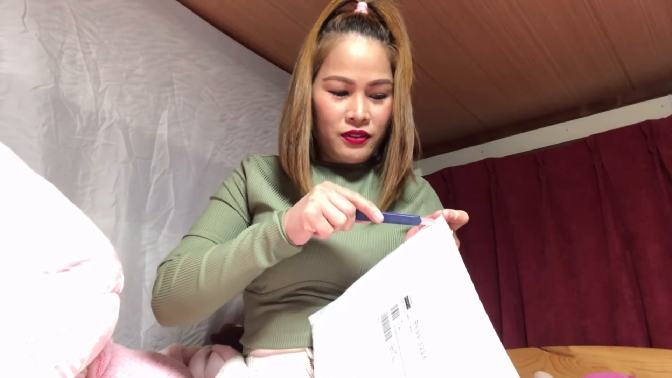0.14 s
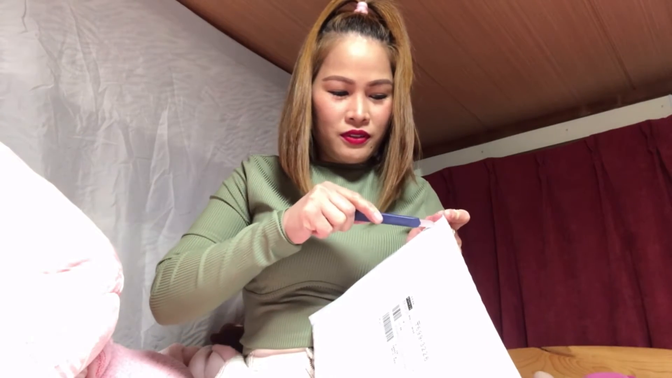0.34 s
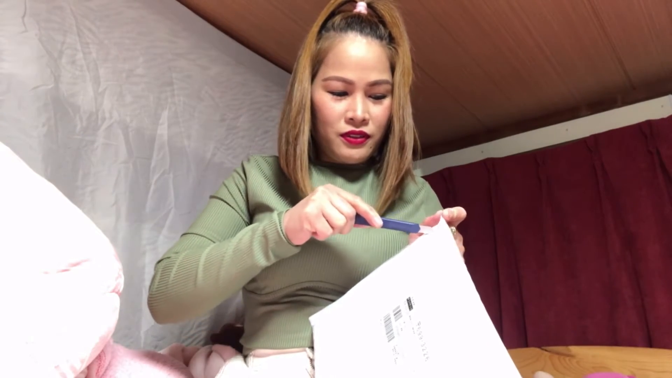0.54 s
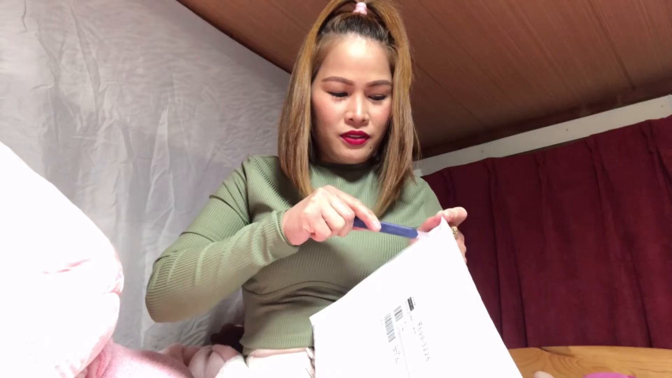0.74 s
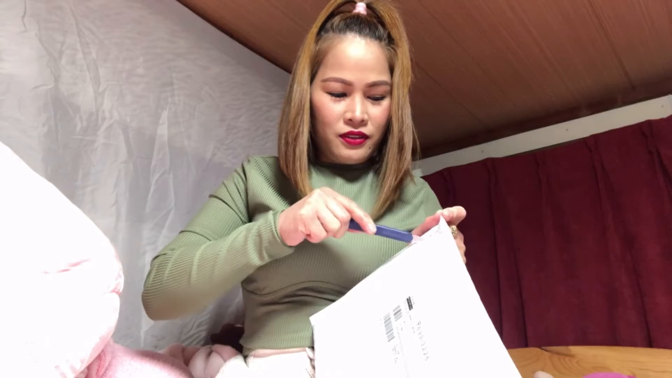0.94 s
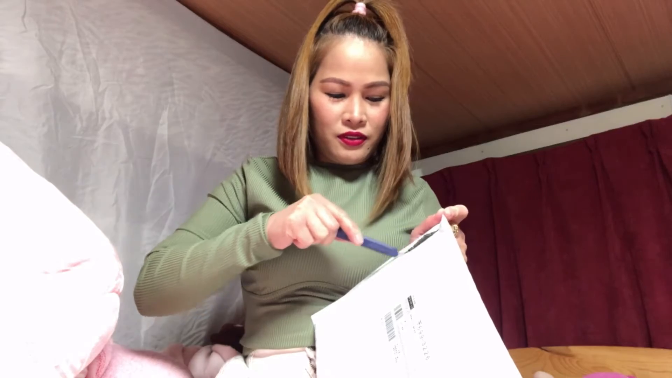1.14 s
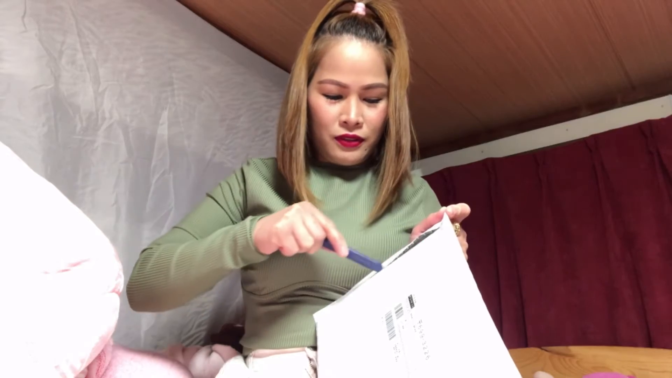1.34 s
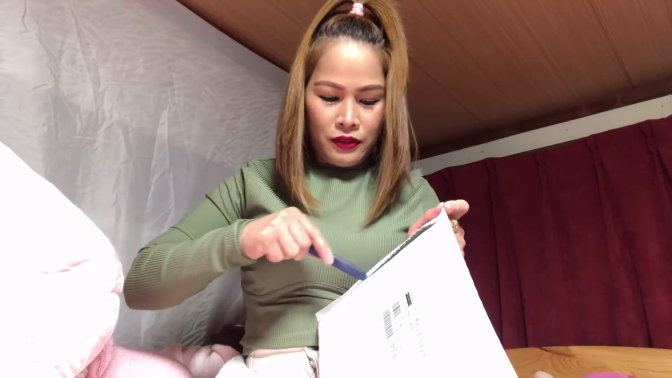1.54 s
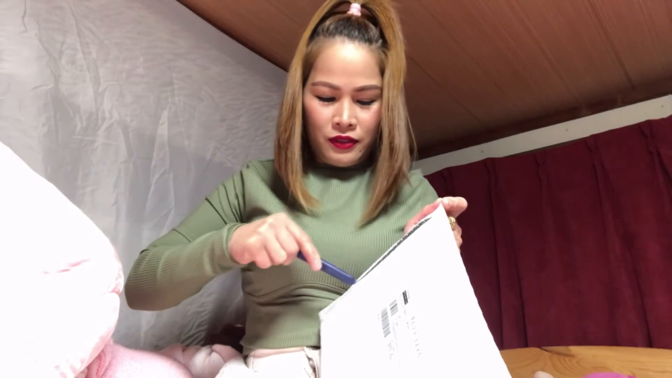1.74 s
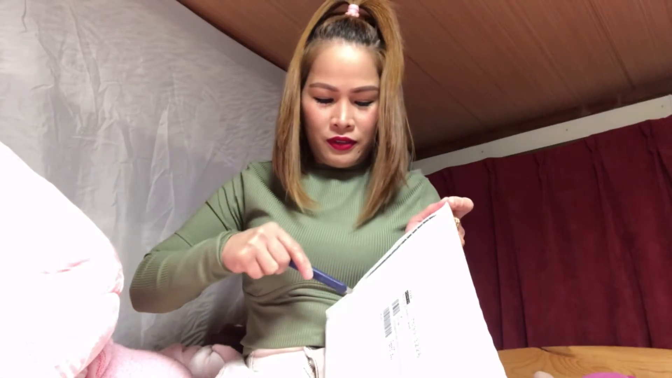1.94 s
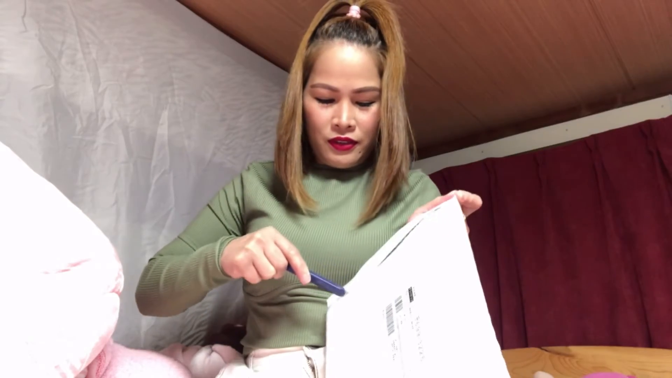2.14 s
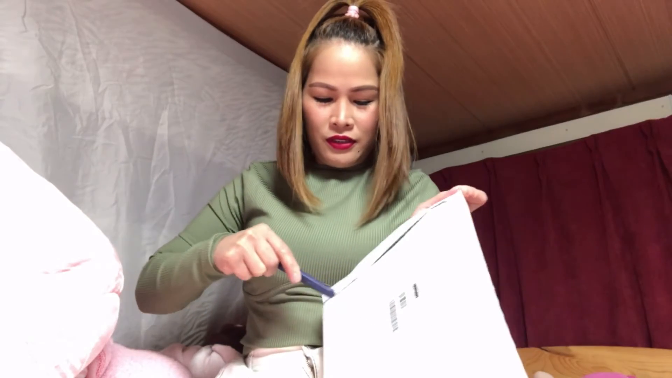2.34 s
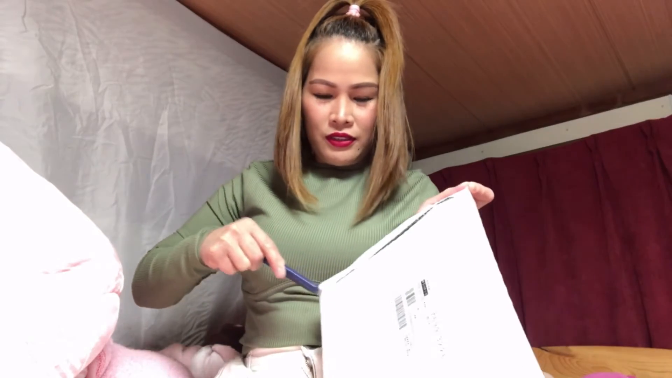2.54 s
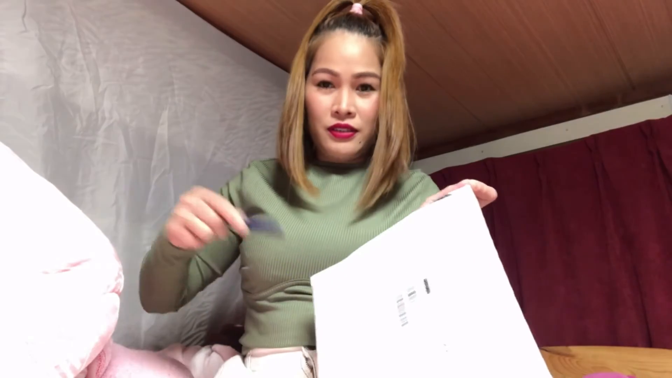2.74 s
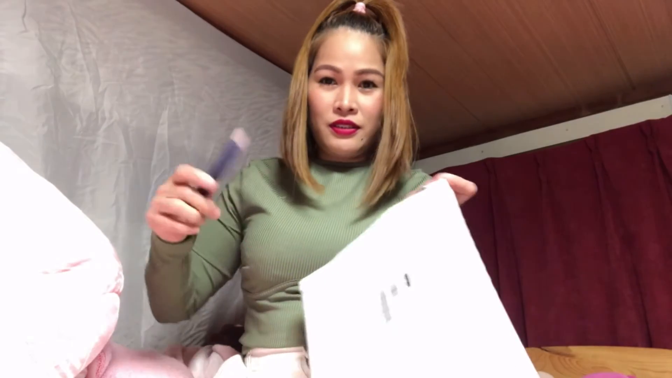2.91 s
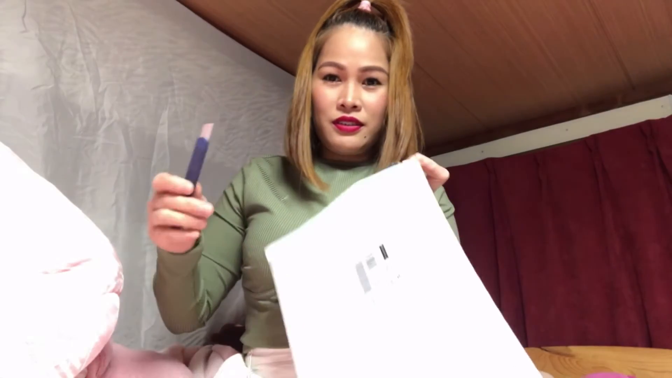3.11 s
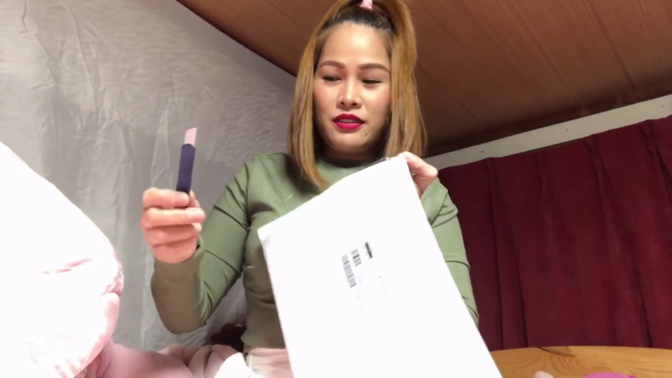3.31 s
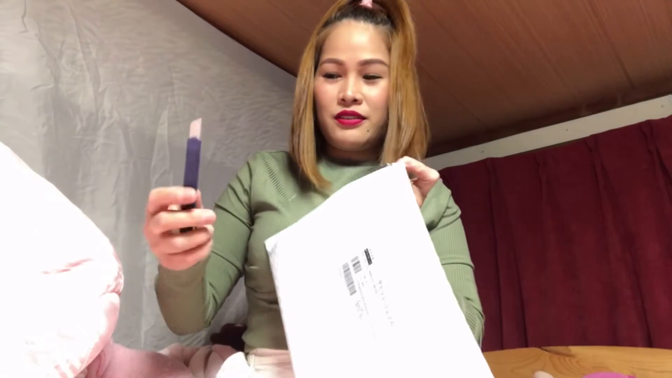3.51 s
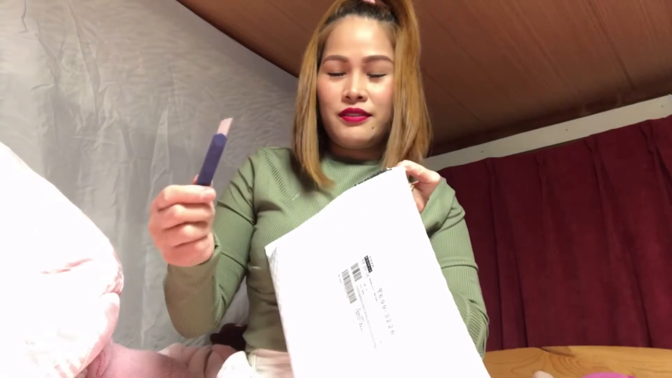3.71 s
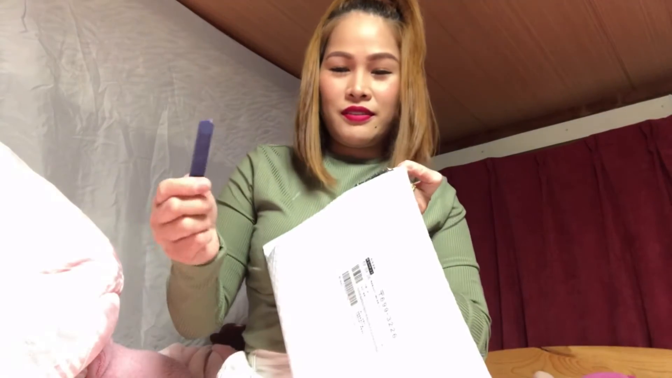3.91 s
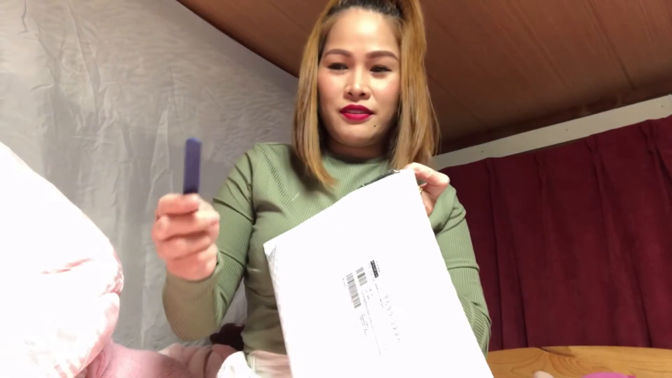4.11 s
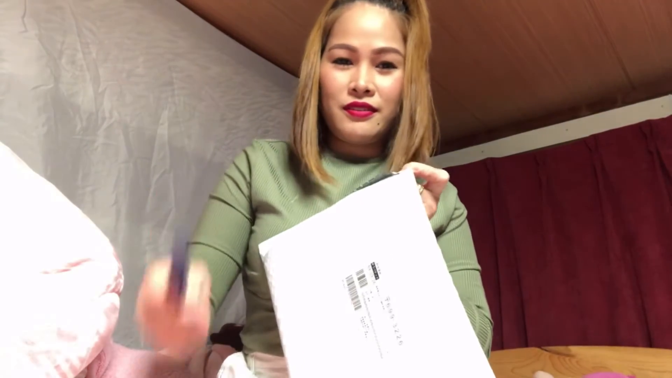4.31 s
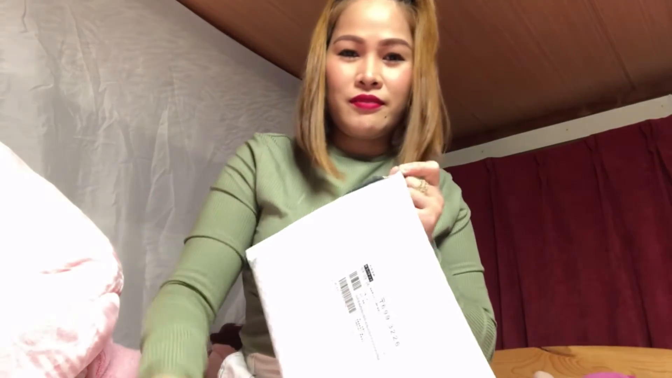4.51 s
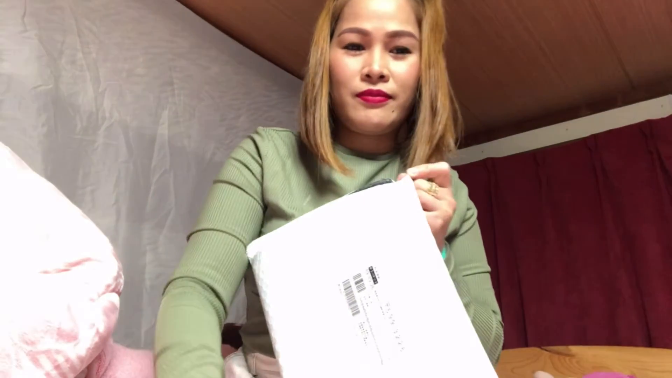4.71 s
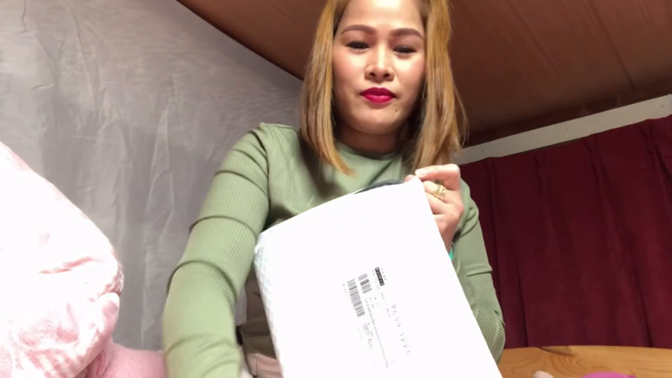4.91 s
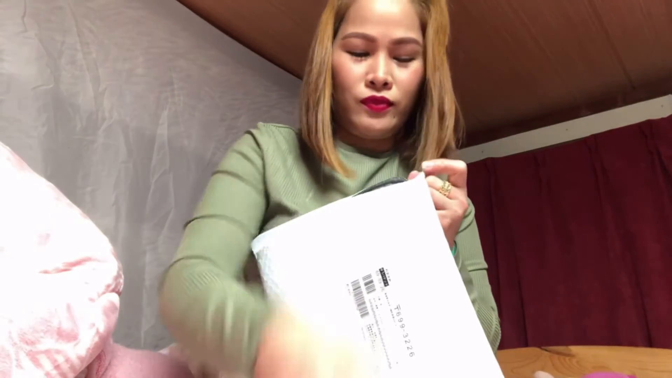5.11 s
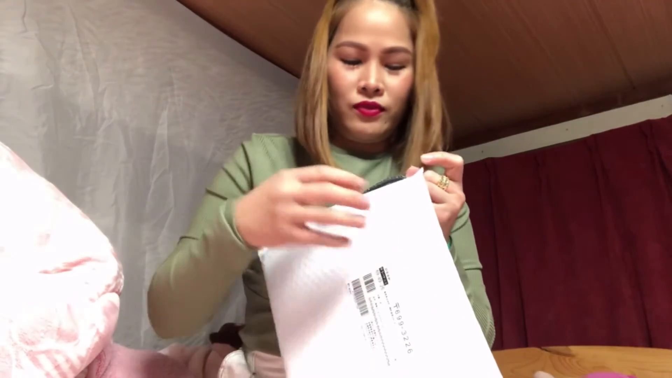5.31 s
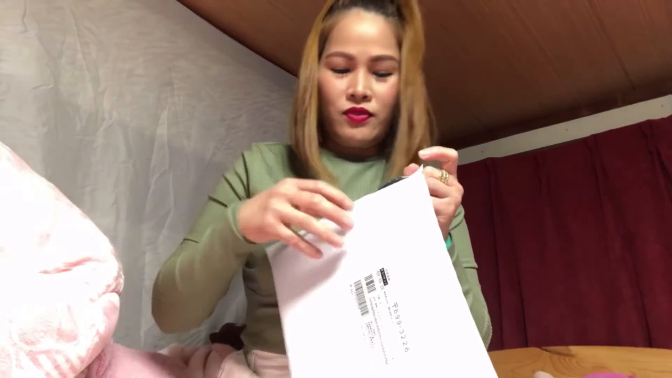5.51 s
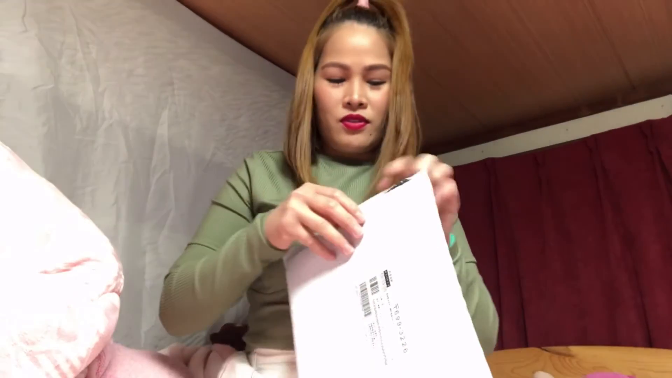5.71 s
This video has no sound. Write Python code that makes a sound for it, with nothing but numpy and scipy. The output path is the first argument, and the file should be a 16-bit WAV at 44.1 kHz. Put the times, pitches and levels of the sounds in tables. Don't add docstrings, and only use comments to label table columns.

```python
import sys
import numpy as np
from scipy import signal
from scipy.fft import irfft
from scipy.io import wavfile
from scipy.ndimage import uniform_filter1d

SR = 44100
rng = np.random.default_rng(int(sys.argv[2]) if len(sys.argv) > 2 else 0)


def linear_from_db(decibels):
    return 10 ** (np.asarray(decibels, float) / 20)


def store_pcm(level_fs):
    pcm = np.round(np.clip(level_fs, -1, 1) * 32767).astype(np.int16)
    wavfile.write(sys.argv[1], SR, np.atleast_2d(pcm).T)


N = 253575
CUT_END_S = 2.47


def envelope():
    # (frequency [Hz], t60 [s])
    sheet_decay = [(300, 0.042), (1000, 0.04), (3000, 0.018), (8000, 0.019), (16000, 0.017)]
    # (frequency [Hz], level [dB])
    shake_colour = [(300, -7), (1000, -8), (1600, -9), (3000, -9), (5000, -6), (10000, -5)]
    rows = bursts()
    noises = rng.standard_normal((len(rows), 600))
    trains = np.zeros((11, N))
    for k, row in enumerate(rows):
        start_s = row[0] - .0005
        add(trains[k % len(trains)], start_s, pop(row, noises[k]))
    shaking = np.zeros(N)
    for train in trains:
        response = dying(sheet_decay, start_s=0.001186, lumpy_db=5.2)
        shaking += signal.oaconvolve(train, response)[:N]
    return trains.sum(0) + coloured(shaking, shake_colour)


def bursts():
    # (time [s], # body peak [dB], snap peak
    # [dB], crack peak [dB])
    cell_pops = [(.0782, -65, -28.5, -31), (.142, -28, -20, -29.5), (.1576, -35, -31.5, -39),
                 (.1753, -52, -38, -42), (.1986, -44, -43, -43), (.279, -55, -47, -47),
                 (.2884, -44, -28.5, -50), (.2972, -35, -23.5, -32.5), (.3098, -37.5, -31.5, -40),
                 (.3132, -37.5, -32, -48), (.381, -53, -48, -51), (.4183, -25, -22.5, -30.5),
                 (.5466, -46, -31, -37), (.5739, -66, -49, -47), (.5904, -40.5, -32, -32),
                 (.6004, -45, -38, -42), (.6088, -68, -36, -45), (.6637, -59, -49, -45.5),
                 (.7394, -42, -35, -31), (.7467, -49, -26.5, -39), (.7614, -28, -20, -25.5),
                 (.787, -57, -46, -39), (.7959, -60, -24.5, -38), (.8142, -31, -23, -32),
                 (.8249, -50, -38, -37), (.8401, -26, -20.5, -23),
                 (0.9665, -36.5, -28.5, -37), (0.975, -46, -35, -44), (0.9823, -22, -20.5, -16),
                  (0.989, -32, -44, -42), (0.9956, -25, -29, -29), (1.0184, -28, -25, -27),
                  (1.0574, -25.5, -21, -19.5), (1.0771, -32, -23.5, -23), (1.0805, -25, -41, -46),
                  (1.131, -52, -42, -41), (1.136, -24.5, -25.5, -20), (1.152, -30, -31, -28),
                  (1.1647, -35, -31, -34), (1.1911, -28, -26.5, -28), (1.205, -29, -32, -33),
                  (1.2231, -20, -23, -24), (1.245, -26.5, -29, -25.5), (1.2698, -27, -46, -37),
                  (1.284, -28, -38, -40), (1.3132, -20.5, -28, -27), (1.3265, -16.5, -20, -20),
                  (1.37, -28, -31, -37), (1.3748, -22.5, -29, -34), (1.3799, -24.5, -26.5, -26.5),
                  (1.425, -25, -27, -35), (1.4397, -21, -28, -28.5),
                 (1.494, -24, -27, -34), (1.512, -34, -47, -50), (1.5125, -28.5, -33, -31.5),
                   (1.5156, -26.5, -35, -48), (1.5752, -24, -27.5, -27), (1.581, -47, -32, -44),
                   (1.5987, -28.5, -30, -37), (1.606, -26, -27.5, -33), (1.66, -23, -26, -29),
                   (1.6888, -30, -24, -31), (1.715, -22, -21.5, -23), (1.733, -49, -42, -54),
                   (1.7485, -31.5, -34, -35), (1.786, -32, -33, -33), (1.7925, -27, -29, -28),
                   (1.7964, -32, -28, -32), (1.8328, -19, -17, -20.5), (1.8533, -26.5, -21, -25),
                   (1.888, -32, -28.5, -24.5), (1.912, -24.5, -21.5, -27), (1.9401, -31.5, -30, -31),
                   (1.9586, -36, -29, -35),
                 (2.0045, -32, -27.5, -35), (2.021, -16, -17, -16.5), (2.0393, -45, -19, -48),
                 (2.0425, -22.5, -47, -28), (2.0736, -28, -19, -32), (2.0848, -28, -31, -36),
                 (2.1022, -17, -13, -14), (2.1391, -22, -13.5, -22), (2.1663, -27, -24, -37),
                 (2.2338, -27, -14, -16), (2.2436, -33, -39, -43), (2.2605, -23, -18, -23.5),
                 (2.274, -27, -20.5, -24), (2.2794, -28.5, -24, -34), (2.3166, -33, -17.5, -32),
                 (2.3232, -29.5, -27, -29), (2.327, -30.5, -22, -30), (2.3629, -30, -19, -33),
                 (2.3739, -29.5, -17, -26.5), (2.416, -44, -36, -44), (2.424, -38.5, -30.5, -41),
                 (2.455, -42, -34.5, -46), (2.637, -25, -27, -31), (2.6445, -28, -31, -41),
                 (2.6515, -47, -34, -53),
                 (0.455, -60, -45, -51), (.5975, -49, -39, -52), (.7886, -55, -43, -50),
              (0.7598, -33, -20.5, -29), (0.833, -54, -50, -53), (1.054, -38, -40, -42),
              (1.177, -39, -34, -37), (1.2011, -52, -41, -52), (1.2534, -50, -34, -54),
              (1.262, -41, -38, -36), (1.288, -54, -37, -37), (1.321, -35, -35, -31), (1.39, -31, -46, -55),
              (1.403, -44, -39, -55), (1.4454, -31, -35, -44), (1.4576, -50, -36, -50),
              (1.521, -37, -40, -40), (1.646, -53, -46, -48), (1.7736, -45, -35, -51),
              (1.899, -40, -46, -54), (1.9078, -38, -34, -54), (1.9554, -39, -43, -55),
              (1.9906, -42, -37, -49), (2.0245, -46, -25, -32), (2.1392, -26.5, -20, -24.5),
              (2.1627, -35, -32, -39), (2.1906, -43, -48, -51), (2.347, -46, -35, -48),
              (2.4284, -43, -48, -53), (2.441, -59, -42, -56), (2.446, -61, -41, -49),
              (2.4492, -52, -38, -41), (2.649, -48, -33, -48)]
    # (time [s], body [Hz], snap [Hz])
    flap = [(0.1, 1670, 3150), (.55, 1200, 3050), (0.762, 990, 2600), (1.05, 1700, 3300),
            (1.25, 1640, 2620), (1.45, 1550, 3140), (1.6, 1180, 2460), (2.08, 1370, 2880),
            (2.4, 1040, 2570), (2.63, 1300, 3560)]
    # (time [s], snap [Hz], snap peak [dB], crack peak [dB])
    handling_ticks = [(2.839, 2800, -33.5, -52), (2.89, 2700, -36.5, -49), (3.158, 2690, -32, -52),
                      (3.1875, 3320, -51, -35), (3.3975, 2730, -43, -49), (3.6562, 4570, -34, -32),
                      (3.674, 4160, -48, -36), (3.707, 3170, -29.5, -47), (3.7344, 2600, -36.5, -35),
                      (3.788, 2670, -40, -40), (2.871, 5840, -42, -40), (3.687, 3000, -48, -57),
                      (3.993, 3620, -30, -46), (4.4055, 6160, -47.5, -59), (4.494, 2600, -43, -62),
                      (4.726, 6000, -53, -43), (5.0853, 3000, -49, -45), (5.093, 5200, -40, -56),
                      (5.1185, 5000, -46, -41), (5.1525, 4830, -43, -49), (4.312, 4500, -37, -43),
                      (4.356, 4800, -51, -44), (4.4453, 3920, -26, -29.5), (4.508, 2380, -47, -58),
                      (4.641, 5000, -43, -47), (4.6826, 2480, -42, -44), (4.71, 2600, -27.5, -42),
                      (4.748, 2700, -35.5, -44), (5.1067, 5470, -28, -29), (5.1325, 2080, -47, -60),
                      (5.1562, 4450, -32, -34.5), (5.1716, 3300, -36.5, -45), (5.296, 2200, -52, -54),
                      (5.484, 2980, -41, -54), (5.637, 2590, -40.5, -49), (5.733, 2700, -49, -51)]
    # (time [s], body [Hz], body peak [dB])
    thuds = [(0.316, 357, -48), (.422, 420, -40), (1.06, 565, -32), (2.025, 241, -39.5), (5.163, 294, -45),
             (.764, 396, -40), (1.137, 570, -28.5), (1.286, 614, -29.5), (1.915, 470, -34),
             (2.9513, 1230, -41), (3.159, 1490, -36.5), (3.706, 1650, -42.5), (3.7354, 1100, -41),
             (4.4461, 1950, -31.5), (4.708, 1400, -30), (4.709, 740, -28.5), (4.71, 452, -32.5),
             (4.7475, 720, -53), (5.099, 1190, -34), (5.1066, 1290, -38), (5.1325, 1190, -36),
             (5.1522, 1130, -40.5), (5.1565, 584, -36.5), (5.171, 1620, -35), (3.2085, 1210, -49),
             (3.235, 1300, -48), (4.508, 1300, -44.5), (4.816, 1200, -47), (5.1125, 515, -38),
             (5.1362, 756, -36), (5.631, 1320, -49.5), (5.484, 1880, -42), (5.733, 670, -48)]
    silent_db = -90
    flap_s, flap_body_hz, flap_snap_hz = np.transpose(flap)
    cells = cell_pops
    scatter = np.exp(.07 * rng.standard_normal((len(cells), 2)))
    rows = []
    for (s, body_db, snap_db, crack_db), (body_shift, snap_shift) in zip(cells, scatter):
        body_hz = np.interp(s, flap_s, flap_body_hz) * body_shift
        snap_hz = np.interp(s, flap_s, flap_snap_hz) * snap_shift
        rows.append((s, body_hz, body_db, snap_hz, snap_db, crack_db))
    for s, hz, snap_db, crack_db in handling_ticks:
        rows.append((s, hz / 2, silent_db, hz, snap_db, crack_db))
    for s, hz, body_db in thuds:
        rows.append((s, hz, body_db, 2 * hz, silent_db, silent_db))
    return rows


def pop(row, noise):
    # (frequency [Hz], level [dB])
    crack_colour = [(3500, -23.5), (5000, 5), (7000, 1), (8600, -4.5), (10500, -4.5), (15500, -5)]
    pull_start_s, slider_end_s = 1, 4.3
    s, body_hz, body_db, snap_hz, snap_db, crack_db = row
    t = np.arange(len(noise)) / SR

    gentle = 0 < s < pull_start_s or s > slider_end_s
    dull_db = -11.5 * gentle
    colour = [(hz, db + dull_db * max(np.log2(hz / 8000), 0)) for hz, db in crack_colour]
    crack_shape = swell(t, .0001, 0.00015) + 0.12 * swell(t, 0, 0.0012)
    crack = coloured(noise * crack_shape, colour)

    snap_turns = snap_hz * (t - .00012 * np.exp(-t / .0008))
    snap = np.sin(2 * np.pi * snap_turns + noise[0]) * swell(t, .0001, .56 / snap_hz)
    body_turns = body_hz * (t - 0.43 * 0.00089 * np.exp(-t / 0.00076))
    swing = np.sin(2 * np.pi * body_turns + noise[1]) * swell(t, 0.00035, 0.4 / body_hz)
    body = band(swing, 180, 1470)
    return linear_from_db(crack_db) * peaked(crack) + linear_from_db(snap_db) * peaked(snap) + linear_from_db(body_db) * peaked(body)


def cell_rings():
    # (time [s], peak [dB], pitch [Hz])
    paper_rings = [(0.0767, -41, 3530), (0.1406, -23, 3400), (0.2872, -37, 3550), (0.2957, -54, 1800),
                   (0.2957, -23, 3520), (0.417, -18.5, 3670), (0.5453, -31, 3630), (0.573, -43, 3510),
                   (0.5891, -23, 4010), (0.745, -18.5, 3770), (0.7597, -21, 3140), (0.7946, -30, 3540),
                   (0.8127, -18.5, 1860), (0.8392, -22, 2540), (0.9652, -32, 3490), (0.9812, -15, 2300),
                   (1.0171, -19, 1780), (1.056, -17.5, 1760), (1.076, -25, 3500), (1.1343, -21, 1790),
                   (1.19, -22, 3650), (1.2228, -22, 1960), (1.2441, -22, 1780), (1.3107, -24, 1800),
                   (1.3248, -12, 1880), (1.3803, -33, 1840), (1.4232, -19, 1820), (1.4923, -25, 1820),
                   (1.5738, -22, 1830), (1.6044, -30, 2460), (1.6584, -31, 1830), (1.687, -29, 2530),
                   (1.714, -21, 3080), (1.832, -16, 3020), (1.852, -19, 3430), (1.886, -23, 2710),
                   (1.9111, -22, 2770), (1.9385, -27, 3330), (2.0043, -21, 2740), (2.019, -10, 2420),
                   (2.0722, -20, 3380), (2.1006, -11, 3280), (2.1385, -10, 3240), (2.1645, -22, 3000),
                   (2.2328, -15, 2730), (2.2589, -11, 2750), (2.3159, -17, 3230), (2.361, -17, 2680)]
    t60_s, rise_s, lag_s = 0.011, 0.00024, .0009
    t, out = np.arange(900) / SR, np.zeros(N)
    shape = linear_from_db(-9 - 60 * t / t60_s) * (1 - np.exp(-t / rise_s))
    for s, db, hz in paper_rings:
        lower = np.sin(2 * np.pi * hz * t)
        upper = 0.35 * np.sin(2 * np.pi * 1.7 * hz * t)
        add(out, s + lag_s, linear_from_db(db) * shape * (lower + upper))
    return out


def creaks():
    # (end [s], length [s], level [dB])
    strains = [(.142, 0.0042, -34), (0.7496, 0.0071, -36), (0.792, .005, -46), (0.815, .005, -35),
               (0.843, .004, -33), (1.515, 0.0043, -35), (1.576, 0.003, -27), (1.598, .005, -39),
               (1.716, 0.005, -37), (1.746, .004, -40), (4, 0.0058, -37), (1.057, .005, -36),
               (1.205, 0.0048, -36), (1.287, 0.0082, -34)]
    out = np.zeros(N)
    draws = rng.standard_normal((len(strains), 2, 500))
    for (end_s, length_s, db), (a, b) in zip(strains, draws):
        u = np.arange(len(a)) / SR / length_s
        grains = a * b * swell(u, 0, 0.31) * (u < 1.3)
        add(out, end_s - length_s, linear_from_db(db) * peaked(band(grains, 1500, 3900)))
    return out


def pocket():
    # (time [s], pitch [Hz], level [dB])
    lip_knocks = [
        (2.616, 1480, -42),
        (2.627, 1670, -45),
        (2.6366, 1440, -28.5),
        (2.6438, 1550, -30),
        (2.6472, 1420, -33),
        (2.6529, 1460, -25.5),
    ]
    slip_s, rise_s, fall_s = 2.634, 0.016, 0.004
    air_hz, air_width = 1550, 0.092
    knock_t60_s = .014
    t = np.arange(N) / SR - slip_s
    drag = rng.standard_normal(N) * np.exp(np.where(t < 0, t / rise_s, -t / fall_s))
    air = band(drag, air_hz * (1 - air_width), air_hz * (1 + air_width))
    out = linear_from_db(-45.5 + 9.5) * peaked(air)
    t = np.arange(1200) / SR
    for s, hz, db in lip_knocks:
        add(out, s, linear_from_db(db - 60 * t / knock_t60_s) * np.sin(2 * np.pi * hz * t))
    return out


def ratchet():
    # (time [s], peak [dB], lead of the first touch [s])
    slider_teeth = [
        (3.8019, -8.5, 0.0017),
        (3.82, -9.5, 0.0012),
        (3.8401, -9, 0.00092),
        (3.8682, -9, 0.0021),
        (3.896, -8.5, 0.0012),
        (3.914, -10, 0.0013),
        (3.9362, -10, 0.0019),
        (3.958, -11, 0.001),
        (3.975, -12.5, 0.00048),
        (3.996, -35, 0.0012),
    ]
    # (frequency [Hz], density [dB per Hz])
    handle_colour = [(350, -33), (600, -46.5), (869, -18), (1750, -18), (2760, 0), (3120, -19),
                     (3830, -2.5), (5120, -8), (5400, -1), (8270, -4), (8990, -6), (11300, -2.5),
                     (16000, -13)]
    # (frequency [Hz], level [dB], t60 [s])
    blade_modes = [(2800, -9, .02), (3960, -12, .015), (4830, -10, .025), (5440, -9, .025),
                   (5850, -10, .025), (6300, -11, .022), (7300, -11, .02), (8280, -11, .02),
                   (10250, -12, .018), (11020, -11, .02), (11950, -15, .12), (14360, -10, .08)]
    t, hits, rung = np.arange(4000) / SR, np.zeros(N), np.zeros(N)
    for s, db, lead_s in slider_teeth:
        # (delay [s], level [dB], rise [s])
        steps = [(0, -6, .001), (lead_s, 0, .0005), (lead_s + 0.0018, -11, .001), (lead_s + 0.0036, -21, .004)]
        shape = sum(linear_from_db(step_db) * swell(t, at_s, rise_s) for at_s, step_db, rise_s in steps)
        hit = linear_from_db(db) * peaked(rng.standard_normal(len(t)) * shape)
        ring = np.zeros(len(t))
        for hz, mode_db, t60_s in blade_modes:
            level_scatter, pitch_scatter = rng.standard_normal(2)
            fall = linear_from_db(mode_db + 4 * level_scatter - 60 * t / t60_s)
            ring += fall * np.sin(2 * np.pi * hz * (1 + .002 * pitch_scatter) * t)
        add(hits, s, hit)
        add(rung, s, signal.oaconvolve(hit, ring))
    rattle = evened(coloured(hits, handle_colour))
    return 1.03 * np.std(hits) * (rattle + linear_from_db(-12) * evened(rung))


def latch():
    # (frequency [Hz], level [dB], t60 [s])
    lock_modes = [(3316, 0, .017), (3800, -5, .014), (4300, -9, .012), (5110, -9, .02), (6020, -11, .02),
                  (6940, -8, .02), (7560, -15, .02), (9130, -8, .03), (10870, -11, .025), (11830, -8, .025),
                  (13420, -17, .025), (2400, -6, .006), (1600, -14, .008)]
    # (time [s], ring peak [dB], rattle peak [dB])
    contacts = [
        (4.2056, -65, -40),
        (4.2068, -48, -23),
        (4.2079, -22.5, -29),
        (4.2096, -33, -25),
    ]
    t, out = np.arange(1500) / SR, np.zeros(N)
    draws = rng.standard_normal((len(contacts), len(t)))
    for (s, ring_db, rattle_db), noise in zip(contacts, draws):
        ring = np.zeros(len(t))
        for k, (hz, db, t60_s) in enumerate(lock_modes):
            ring += linear_from_db(db - 60 * t / t60_s) * np.sin(2 * np.pi * hz * t + 3 * noise[k])
        ring *= np.minimum(t / 0.00096, 1)
        rattle = band(noise * swell(t, 0, 0.00056), 4700, 13600)
        add(out, s, linear_from_db(ring_db) * peaked(ring) + linear_from_db(rattle_db) * peaked(rattle))
    return out


def rubbing():
    # (time [s], level [dB])
    rub_level = [(0, -86), (.4, -91), (.72, -86.5), (.95, -79), (1.05, -63.5), (1.6, -68.5), (2.102, -66.5),
                 (2.5, -60.5), (3.0, -56.5), (3.33, -65.5), (3.5, -66.5), (4.1, -65), (4.45, -58),
                 (4.9, -66), (5.03, -63), (5.22, -64), (5.37, -68.5), (5.5, -58)]
    # (frequency [Hz], density [dB per Hz])
    rub_colour = [(180, -48.5), (300, -6.5), (537, 0), (614, 0.5), (701, 0), (801, -2.5), (3460, -1.5),
                  (4020, -9), (5160, -4.5), (6850, -7.5), (11500, -12), (16000, -17)]

    def colour(hz, t):
        swipe_db, swipe_body_db = pressure(t)
        patches = rng.standard_normal((len(t), len(hz)))
        patches = uniform_filter1d(uniform_filter1d(patches, 12, 0), 4, 1).T
        flicker = uniform_filter1d(rng.standard_normal(len(t)), 4)
        tilt_db = -3 - 0.14 * swipe_db
        bright = tilt_db * np.clip(np.log2((hz + 1) / 4000), 0, 1.5)
        body_db = np.where(t < CUT_END_S, 10.5, 0) + swipe_body_db
        body = body_db * np.clip(np.log2(1500 / (hz + 1)), 0, 1)
        return read(rub_colour, hz) + bright + body + 2.0 * evened(patches) + 1.7 * evened(flicker)

    t = np.arange(N) / SR
    s, level_db = np.transpose(rub_level)
    loudness = linear_from_db(np.interp(t, s, level_db) + pressure(t)[0] + 1.5)
    return loudness * (evened(field(colour, size=256)) + crackle(t))


def pressure(t):
    # (centre [s], length [s], rise [dB], extra low body [dB])
    swipes = [(0.478, 0.15, 28.5, -17), (0.841, 0.061, 37, -2), (0.991, 0.065, 29, 2),
              (1.222, 0.24, 7, 5.5), (1.757, 0.41, 7, -7), (2.085, 0.31, 7.5, 7.5), (2.337, 0.25, 8.5, 1),
              (2.624, 0.28, 7.5, 0.5), (3.04, 0.14, 5, 0.5), (3.267, 0.29, 10.5, 7),
              (3.404, 0.077, 12.5, 2.5), (3.667, 0.18, 7.5, -7.5), (3.999, 0.088, 15, -2),
              (4.847, 0.52, 10.5, 2), (5.123, 0.2, 11.5, 5.5), (5.76, 0.07, 16, 4)]
    total = 0
    for s, length_s, *rises_db in swipes:
        hump = np.cos(np.pi * np.clip((t - s) / length_s, -.5, .5)) ** 2
        total = total + np.outer(rises_db, hump)
    return total


def crackle(t):
    rate_hz, kinds = 520, 8
    draws, out = rng.random((N, 2)), np.zeros(N)
    happens = draws[:, 0] < rate_hz / SR
    size = linear_from_db(-3.5 * np.maximum(np.log(draws[:, 1] + 1e-9), -2.5)) * happens
    kind = rng.integers(0, kinds, N)
    for k in range(kinds):
        body_hz, snap_hz = rng.uniform([900, 2400], [1900, 4500])
        tiny = pop((0, body_hz, -4, snap_hz, 0, -9), rng.standard_normal(600))
        out += signal.oaconvolve(size * (kind == k), tiny)[:N]
    return evened(out) * linear_from_db(np.where(t < CUT_END_S, -1, -13))


def room(x):
    # (frequency [Hz], t60 [s])
    room_decay = [(300, 0.13), (1300, 0.11), (4000, 0.14), (12000, 0.14)]
    turn = 2 * np.pi * 7 * np.arange(N) / SR
    out = np.zeros(N)
    for k in range(3):
        share = np.sqrt(2 / 3) * np.cos(turn + k * np.pi / 3)
        out += signal.oaconvolve(x * share, dying(room_decay, start_s=.006, lumpy_db=1.3))[:N]
    return out


def hum():
    # (frequency [Hz], width [Hz], level [dB])
    motor_lines = [(41, .3, -63.5), (63, 2.3, -72.5), (83.3, 9.6, -66), (103.2, 4.4, -62),
                   (121.5, 6.4, -63.5), (158.5, 49, -70)]
    grid_hz = np.fft.rfftfreq(N, 1 / SR)
    a, b = rng.standard_normal((2, len(grid_hz)))
    hz, _, db = motor_lines[0]
    out = linear_from_db(db + 3) * np.sin(2 * np.pi * hz * np.arange(N) / SR)
    for hz, width_hz, db in motor_lines[1:]:
        line = irfft((a + 1j * b) * np.exp(-((grid_hz - hz) / width_hz) ** 2), N)
        out += linear_from_db(db) * evened(line)
    return out


def hiss():
    # (frequency [Hz], density [dB per Hz])
    hiss_colour = [(76, -27), (130, -6.5), (166, -4), (264, -4), (559, -9.5), (1090, -19), (3070, -28),
                   (4420, -28.5), (5090, -26.5), (15200, -39), (16500, -62.5)]
    return linear_from_db(-59.5 - 3.5) * evened(field(lambda hz, t: read(hiss_colour, hz) + 0 * t, size=1024))


def dying(decays, start_s, lumpy_db):
    lumps = evened(uniform_filter1d(rng.standard_normal(SR // 2), size=24))
    noise = rng.standard_normal(SR // 2) * linear_from_db(lumpy_db * lumps)
    hz, t, z = signal.stft(noise, SR, nperseg=128)
    fall = linear_from_db(-60 * t / read(decays, hz)[:, None])
    tail = signal.istft(z * fall, SR, nperseg=128)[1]
    tail = np.concatenate([np.zeros(max(round(start_s * SR), 1)), tail])
    return tail / np.linalg.norm(tail)


def field(level_db, size):
    hz = np.fft.rfftfreq(size, 1 / SR)[:, None]
    t = np.arange(4 * N // size + 5) * size / 4 / SR
    a, b = rng.standard_normal((len(t), len(hz), 2)).T
    spectra = (a + 1j * b) * linear_from_db(level_db(hz, t))
    return signal.istft(spectra, nperseg=size, noverlap=size - size // 4)[1][:N]


def swell(t, start_s, rise_s):
    u = np.maximum(t - start_s, 0) / rise_s
    return u * np.exp(1 - u)


def coloured(x, points):
    gains = linear_from_db(read(points, np.fft.rfftfreq(256, 1 / SR)))
    taps = np.fft.fftshift(irfft(gains))
    return signal.oaconvolve(x, taps * np.hanning(len(taps)), "same")


def band(x, lo_hz, hi_hz):
    sos = signal.butter(2, [lo_hz, min(hi_hz, SR / 2.2)], "bandpass", fs=SR, output="sos")
    return signal.sosfilt(sos, x)


def read(points, hz):
    f, value = np.transpose(points)
    return np.interp(np.log(hz + 1), np.log(f + 1), value)


def evened(x):
    return x / np.sqrt(np.mean(x ** 2) + 1e-20)


def peaked(x):
    return x / (abs(x).max() + 1e-20)


def add(mix, s, sound):
    part = mix[max(round(s * SR), 0):][:len(sound)]
    part += sound[:len(part)]


def scene():
    # (delay [s], level [dB])
    echoes = [
        (.0021, -28.5),
        (.0033, -16),
    ]
    near = envelope() + ratchet() + latch() + cell_rings()
    early = near.copy()
    for s, db in echoes:
        add(early, s, linear_from_db(db) * near)
    wet = linear_from_db(-16.5) * room(near)
    return (early + wet + rubbing() + hum() + hiss() + pocket() + creaks())[None]


def band_limit(x):
    return signal.sosfilt(signal.butter(12, 16830, fs=SR, output="sos"), x)


def record(dry):
    edge = signal.firwin(63, 16000, fs=SR)[None]
    mix = signal.oaconvolve(dry, edge, "same")
    return band_limit(mix)


dry = scene()
out = record(dry)
store_pcm(out)
```